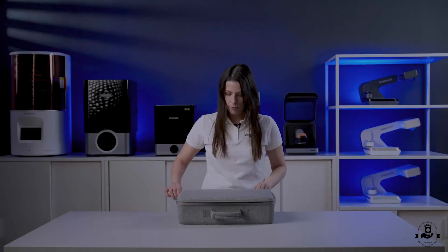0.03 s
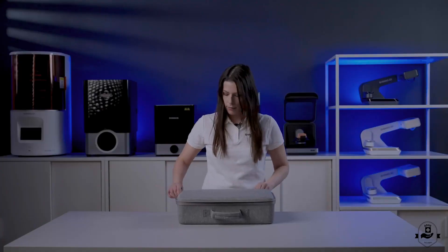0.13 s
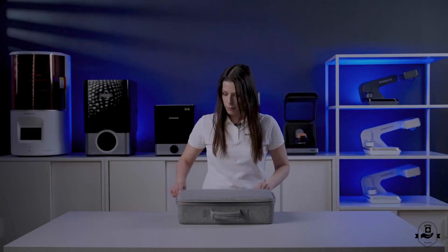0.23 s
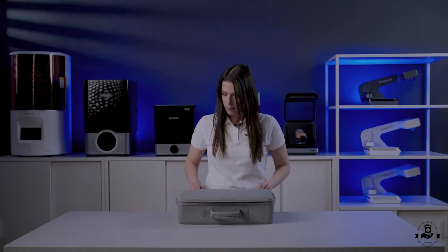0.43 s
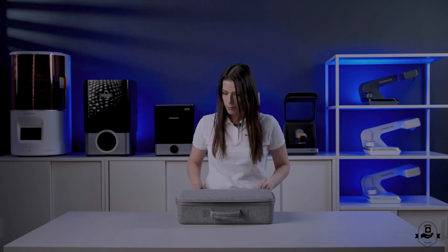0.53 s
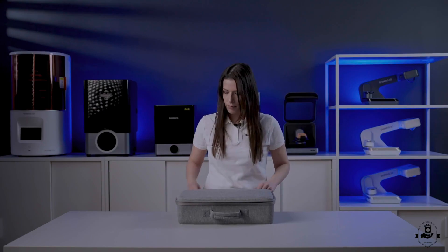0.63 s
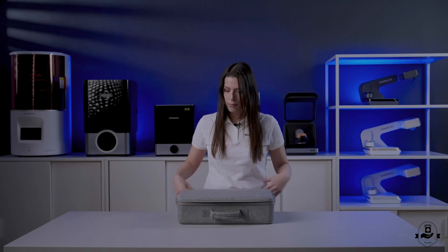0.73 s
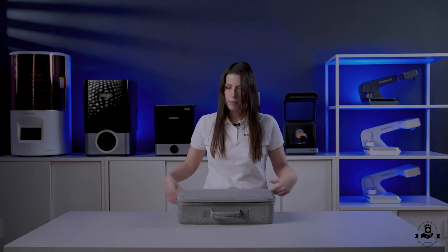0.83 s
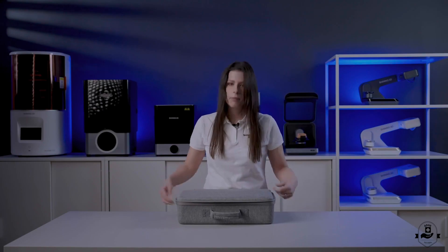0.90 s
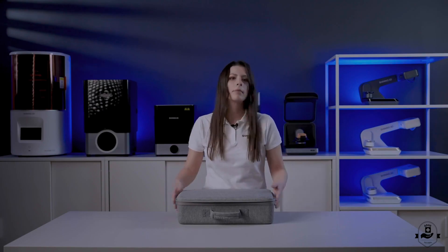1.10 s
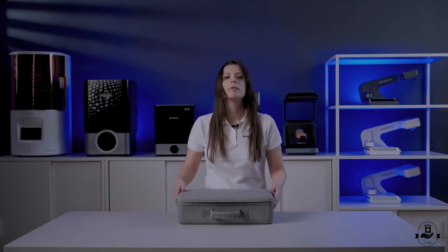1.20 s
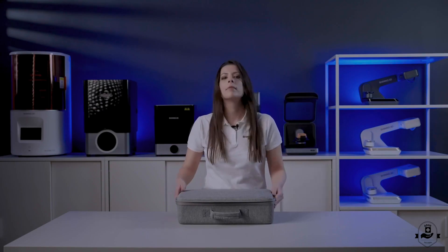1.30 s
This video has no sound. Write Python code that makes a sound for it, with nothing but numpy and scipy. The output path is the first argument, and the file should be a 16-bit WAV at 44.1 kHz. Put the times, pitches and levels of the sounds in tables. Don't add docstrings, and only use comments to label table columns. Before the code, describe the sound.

A zip on a padded fabric case is pulled once. Faint cloth brushing opens, with light ticks and soft bumps from 0.14 s and a slight metallic scrape from 0.2 s. The rasp runs 0.28-0.44 s, dull at first, then fast and bright, with a low cloth thump. Rubbing fades; the tab rattles crisply at 0.70-0.82 s. Faint taps follow near 0.91 and 1.19 s over quiet room air.

```python
import sys
import numpy as np
from scipy import signal
from scipy.io import wavfile
from scipy.ndimage import uniform_filter1d

SR = 44100
rng = np.random.default_rng(int(sys.argv[2]) if len(sys.argv) > 2 else 0)


def natural_amplitude(level_db):
    exponent = np.asarray(level_db, float) / 20
    return 10 ** exponent


def to_wav(sig):
    pcm = np.clip(np.atleast_2d(sig), -1, 1) * 32767
    pcm = np.round(pcm).astype(np.int16)
    wavfile.write(sys.argv[1], SR, pcm.T)


N = 59535


def zip_pull():
    # start_s, click_db, push_db, low_ring_db, high_ring_db, top_ring_db
    pull_path = [
        (0.2845, -42, -40, 3.5, -9, -19),
        (0.301, -35.5, -37.5, 7.5, -6, -8),
        (.315, -36, -28.5, 6.5, 1, -4),
        (0.327, -27.5, -32, -1.5, 2, 0.5),
        (0.348, -29, -34.5, 1, -2, -1),
        (.362, -29.5, -34, 2, 2, -7),
        (0.384, -26.5, -24.5, -6, -1, -9.5),
        (0.404, -29, -31, -7.5, 0.5, -5),
        (0.442, -38.5, -37, 4, -0.5, -6),
    ]
    # start_s, rate_teeth_per_s
    slider_speed = [
        (0.2845, 191.4),
        (0.31, 221.5),
        (0.326, 443.6),
        (0.344, 497.1),
        (0.361, 483.8),
        (0.368, 315.7),
        (0.382, 279.1),
        (0.395, 317.8),
        (0.4415, 296.9),
    ]
    # pitch_hz, width_hz, level_db
    slider_main = [(2900, 380, -8), (3555, 180, 0.5), (3704, 330, -1), (4330, 520, 0)]
    slider_low = [(1080, 340, -5.5), (1378, 127, 0), (2083, 640, -6)]
    slider_high = [(5330, 1300, -4), (6400, 670, -0.5), (7300, 360, -11.5)]
    slider_top = [(8420, 900, -3.5), (10840, 310, -4.5), (13000, 3400, -12), (15800, 1100, -12.5)]
    shell = [(205, 120, -28.5), (305, 160, -3.5), (453, 73, 5.5), (605, 144, -2), (902, 71, -4.5),
             (1201, 200, -12.5)]
    # pitch_hz, width_hz, taken_out_db
    dips = [(1750, 300, -5), (5000, 600, -4), (7650, 500, -4)]
    tooth_jitter_s, tooth_spread_db, push_spread_db = 0.02, 1.2, 1.0
    click_decay_s, rasp_db = 0.00028, -20
    tilt_s, weak_db = 0.364, 13

    start_s, click_db, push_db, *colour_db = np.transpose(pull_path)
    speed_s, teeth_per_s = np.transpose(slider_speed)
    t = np.arange(int(speed_s[0] * SR), int(speed_s[-1] * SR)) / SR
    teeth_passed = np.cumsum(np.interp(t, speed_s, teeth_per_s)) / SR
    half_teeth = np.arange(int(2 * teeth_passed[-1]) + 1)
    chance = rng.standard_normal((120, 3))[half_teeth]
    hit_s = np.interp(half_teeth / 2 + tooth_jitter_s * chance[:, 0], teeth_passed, t)
    loss_db = (half_teeth % 2) * np.where(hit_s > tilt_s, weak_db, 600)

    clicks, pushes = np.zeros(N), np.zeros(N)
    i = (hit_s * SR).astype(int)
    clicks[i] = natural_amplitude(np.interp(hit_s, start_s, click_db) - loss_db + tooth_spread_db * chance[:, 1])
    hit_push_db = np.interp(hit_s, start_s, push_db) + 30.5
    pushes[i] = natural_amplitude(hit_push_db - 0.45 * loss_db + push_spread_db * chance[:, 2])

    noise = rng.standard_normal((2, N))
    r = np.exp(-1 / (click_decay_s * SR))
    bursts = signal.lfilter([(1 - r) * np.e], [1, -2 * r, r * r], clicks)
    crack = bursts * np.sign(noise[0]) * 0.25 + 4.2 * clicks
    smear = uniform_filter1d(uniform_filter1d(clicks, size=300), size=300) * 150
    crack = natural_amplitude(13) * (crack + natural_amplitude(rasp_db) * smear * noise[1])

    slider = resonate(crack, slider_main)
    for db, peaks in zip(colour_db, (slider_low, slider_high, slider_top)):
        colour = natural_amplitude(np.interp(np.arange(N) / SR, start_s, db))
        slider = slider + resonate(crack * colour, peaks)
    for dip in dips:
        slider = slider - resonate(slider, [dip])
    return slider + resonate(pushes, shell)


def scrape():
    creep_s = (.2, .222, .285, .33)
    # pitch_hz, width_hz, level_db
    scrape_rings = [(2950, 500, 2), (4150, 500, -10), (5400, 1200, -16), (11500, 3000, -24)]
    shape = np.interp(np.arange(N) / SR, creep_s, [0, 1, 1, 0])
    rough = rng.standard_normal(N) * natural_amplitude(4.0 * drift(250))
    return natural_amplitude(-53) * shape * resonate(rough, scrape_rings)


def ticks():
    # start_s, peak_db, centre_hz, decay_s
    tab_ticks = [(.1585, -58, 5000, .0008), (.1951, -35, 4200, .0007), (.1953, -46, 13000, .0005),
                 (.2028, -49, 6000, .001), (.2158, -41, 2000, .0009), (.2392, -48, 2800, .0012),
                 (.252, -51, 2500, .0012), (.2605, -48, 2600, .0015), (.2695, -51, 3000, .0012),
                 (.2772, -48, 2600, .001), (.4398, -44, 4000, .001), (.4432, -47, 7000, .0015),
                 (.4465, -48, 6000, .002), (.7025, -58, 6000, .0007), (.7145, -55, 10000, .0007),
                 (.7224, -55, 13000, .0012), (.7335, -54, 3500, .001), (.7225, -57, 5000, .001),
                 (.7325, -51, 13000, .0015), (.7412, -50, 5000, .0006), (.7488, -35, 7500, .0007),
                 (.7534, -36, 7500, .0007), (.7616, -30.5, 10000, .001), (.7705, -49, 8000, .002),
                 (.7855, -51, 6500, .0012), (.7886, -46, 6000, .0011), (.7916, -42, 8000, .001),
                 (.7918, -53, 2700, .001), (.7945, -45, 10000, .0011), (.7473, -47, 10000, .0007),
                 (.7585, -52, 7000, .001), (.7655, -50, 10000, .001), (.7735, -51, 6000, .001),
                 (.779, -53, 6500, .0015), (.798, -54, 3000, .002), (.816, -58, 2800, .001),
                 (.9095, -64, 1200, .001), (.918, -64, 4000, .0006), (.962, -66, 5500, .0006)]
    # pitch_hz, width_hz, level_db
    tab_rings = [(1130, 170, 16), (2700, 410, 9.5), (5250, 2000, -2.5), (6120, 520, 4.5),
                 (7700, 1200, -0.5), (9660, 710, -2), (13400, 4200, -3.5)]
    out, t = np.zeros(N + SR), np.arange(800) / SR
    for start_s, peak_db, centre_hz, decay_s in tab_ticks:
        crack = rng.standard_normal(len(t)) * t / decay_s * np.exp(1 - 2 * t / decay_s)
        peaks = []
        for pitch_hz, width_hz, db in tab_rings:
            octaves_away = abs(np.log2(pitch_hz / centre_hz))
            peaks.append((pitch_hz, width_hz, db - 7 * octaves_away + 2 * rng.standard_normal()))
        crack = resonate(crack, peaks)
        crack = crack + natural_amplitude(-20) * np.diff(crack, prepend=0)
        crack = signal.lfilter(*signal.butter(2, min(2.6 * centre_hz, 20000), fs=SR), crack)
        out[int(start_s * SR):][:len(t)] += natural_amplitude(peak_db) * crack / np.abs(crack).max()
    return out[:N]


def knocks():
    # start_s, level_db, pitch_hz, time_to_fade_60_db_s
    case_knocks = [(0.1419, -37, 437, 0.019), (0.153, -49.5, 320, 0.047), (0.195, -42, 1034, 0.016),
                   (0.2175, -45, 1000, 0.058), (.222, -43.5, 532, .05), (0.23, -31, 187, 0.11),
                   (.235, -41, 128, 0.16), (.275, -26, 222, 0.025), (.289, -31.5, 157, 0.16),
                   (0.315, -23.5, 216, 0.049), (0.404, -45, 291, 0.085), (0.4326, -37.5, 305, 0.072),
                   (0.4387, -32, 306, 0.036), (.42, -48.5, 982, 0.12), (.466, -43.5, 605, 0.033),
                   (0.7318, -50.5, 860, 0.031), (0.7412, -44, 432, 0.048), (.7475, -38.5, 750, 0.025),
                   (0.755, -40, 1010, 0.015), (0.749, -45, 205, 0.15), (.762, -25.5, 590, 0.005),
                   (.7885, -46, 613, 0.039), (.798, -47.5, 403, 0.025), (0.7923, -47.5, 1046, 0.015),
                   (.792, -47.5, 207.4, 0.081), (0.9078, -43, 766, 0.014), (0.909, -55, 1250, 0.014),
                   (0.909, -52, 550, 0.013), (.917, -47.5, 600, 0.012), (.921, -58.5, 895, 0.025),
                   (.933, -60, 704, .03), (.909, -55, 382, 0.014), (0.91, -65.5, 1650, 0.012),
                   (0.966, -54, 109, 0.044), (1.185, -45.5, 194, 0.02), (1.205, -53, 191, 0.061)]
    out, t = np.zeros(N + SR), np.arange(SR // 4) / SR
    for start_s, db, hz, fade_s in case_knocks:
        fade = natural_amplitude(db - 60 * t / fade_s)
        soft_start = 1 - np.exp(-t * hz * 0.95)
        out[int(start_s * SR):][:len(t)] += fade * soft_start * 2 * np.sin(2 * np.pi * hz * t)
    return out[:N]


def rubbing():
    # time_s, level_db
    rub_path = [(0, -53.5), (0.048, -67), (.12, -72), (0.188, -66), (0.197, -50), (.27, -47.5),
                (0.446, -51), (0.598, -73), (.66, -71.5), (0.707, -70.5), (0.751, -57.5), (0.797, -64),
                (.83, -73.5), (.9, -78), (0.924, -75), (0.969, -80.5), (1.15, -76), (1.193, -66.5),
                (1.262, -69.5)]
    # pitch_hz, level_db_per_hz
    cloth_colour = [(150, -41), (250, -9.5), (329, -10.5), (963, -16.5), (1160, -24.5), (2900, -28.5),
                    (8000, -40), (10400, -88), (17600, -120)]
    time_s, db = np.transpose(rub_path)
    grains = rng.standard_normal((2, N)) * natural_amplitude(1.5 * drift(120))
    cloth = signal.lfilter(*signal.butter(4, 6500, fs=SR), banded(cloth_colour, 1.0, grains))
    return natural_amplitude(np.interp(np.arange(N) / SR, time_s, db)) * cloth


def room(x):
    fade_s, treble_fade_s, wall_cut_hz = 0.2, 0.041, 10000
    t = np.arange(SR // 2) / SR
    tail = rng.standard_normal(len(t)) * natural_amplitude(-60 * t / fade_s) * (t > .004)
    dull = signal.lfilter(*signal.butter(2, wall_cut_hz, fs=SR), tail)
    tail = dull + (tail - dull) * natural_amplitude(-60 * t / treble_fade_s)
    return signal.fftconvolve(x, tail / np.sqrt(np.sum(tail ** 2)))[:N]


def room_air():
    # pitch_hz, level_db
    air_colour = [(18, -56), (30, -18), (130, 3), (249, -17), (452, -18.5), (708, -20), (1390, -30),
                  (1960, -34), (11500, -32), (15000, -80), (22000, -120)]
    return natural_amplitude(-65.5) * banded(air_colour, 0.43, rng.standard_normal((2, N)))


def side_hiss():
    # pitch_hz, level_db
    hiss_colour = [(590, -54), (1000, -19), (6040, -21.5), (7190, -18), (13100, -11), (16000, -9)]
    return natural_amplitude(-88.5) * banded(hiss_colour, 0.64, rng.standard_normal((2, N)))


def rms_one(x):
    return x / np.sqrt(np.mean(x ** 2) + 1e-20)


def drift(rate_hz):
    r = np.exp(-2 * np.pi * rate_hz / SR)
    wander = signal.lfilter([1], [1, -2 * r, r * r], rng.standard_normal(N + 20000))
    return rms_one(wander[20000:])


def resonate(x, peaks):
    out = 0
    for k, (hz, width_hz, db) in enumerate(peaks):
        r = np.exp(-np.pi * width_hz / SR)
        feedback = [1, -2 * r * np.cos(2 * np.pi * hz / SR), r * r]
        ring = signal.lfilter([(1 - r * r) / 2, 0, (r * r - 1) / 2], feedback, x + 1e-18)
        out = out + (-1) ** k * natural_amplitude(db) * ring
    return out


def banded(spectrum, patchy_db, white):
    hz, db = np.transpose(spectrum)
    edges = 30 * 2 ** np.arange(0, 9.2, 1 / 3)
    out = 0
    for k, (low, high) in enumerate(zip(edges, edges[1:])):
        band = signal.sosfilt(signal.butter(2, [low, high], "band", fs=SR, output="sos"), white[k % 2])
        level_db = np.interp(np.log(low * high) / 2, np.log(hz), db, left=-70, right=db[-2])
        out = out + natural_amplitude(level_db + patchy_db * drift(36)) * band
    return rms_one(out)


def scene():
    tab = ticks()
    pull = zip_pull()
    case = pull + knocks() + tab + scrape()
    mid = case + natural_amplitude(-15) * room(case) + rubbing() + room_air()
    first_teeth = pull * (np.arange(N) < .32 * SR)
    wide = np.roll(tab, shift=9) + natural_amplitude(-5.0) * first_teeth
    wide = signal.lfilter(*signal.butter(2, 3000, "high", fs=SR), wide)
    side = side_hiss() + natural_amplitude(-18) * wide
    return np.array([mid + side, mid - side])


def top_cut(x):
    return signal.sosfilt(signal.butter(12, 16410, fs=SR, output="sos"), x)


def record(dry):
    noise = rng.standard_normal((2, N))
    hiss = noise[0] + 0.5 * noise[1] * [[1], [-1]]
    hiss = signal.sosfilt(signal.butter(6, 13600, "high", fs=SR, output="sos"), hiss)
    x = dry + natural_amplitude(-64.5) * hiss
    x = signal.sosfilt(signal.butter(6, 66, "high", fs=SR, output="sos"), x)
    x = signal.sosfilt(signal.cheby1(10, 1, 15050, fs=SR, output="sos"), x)
    return top_cut(x)


dry = scene()
out = record(dry)
to_wav(out)
```